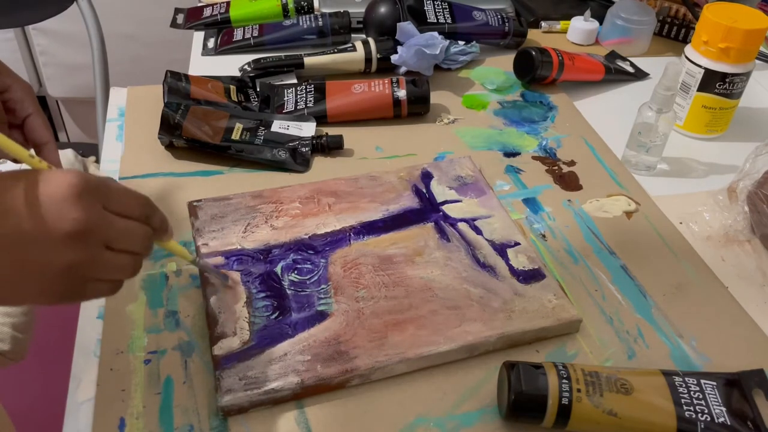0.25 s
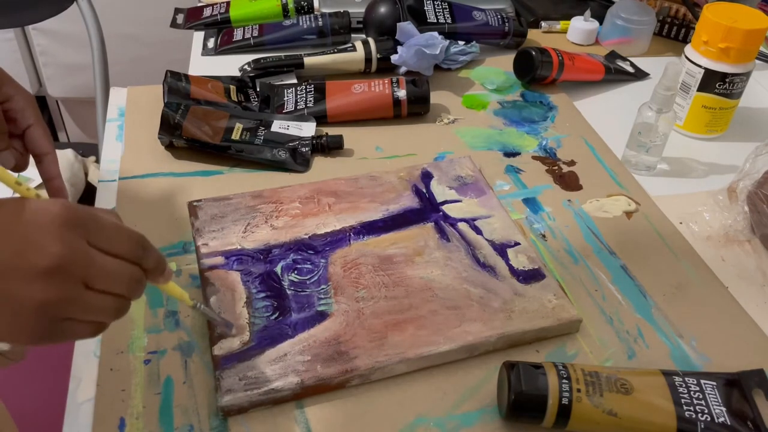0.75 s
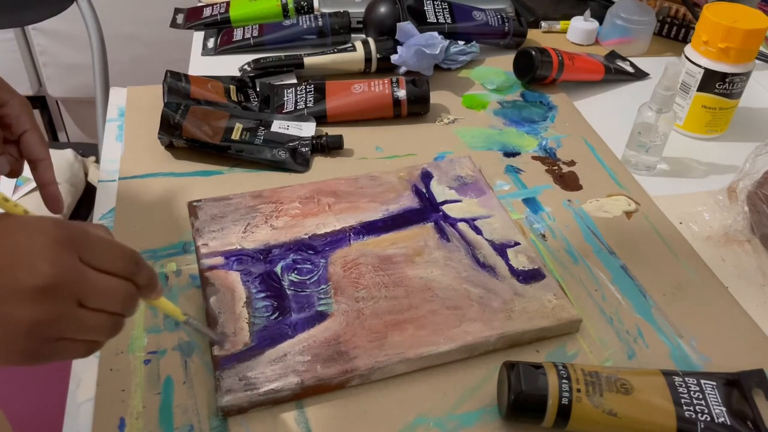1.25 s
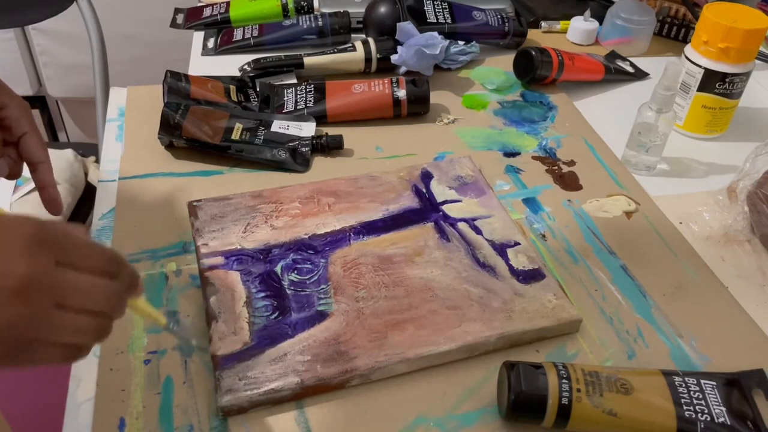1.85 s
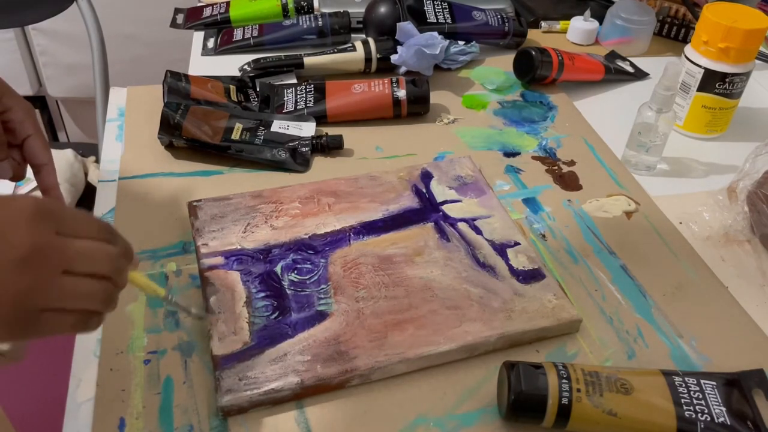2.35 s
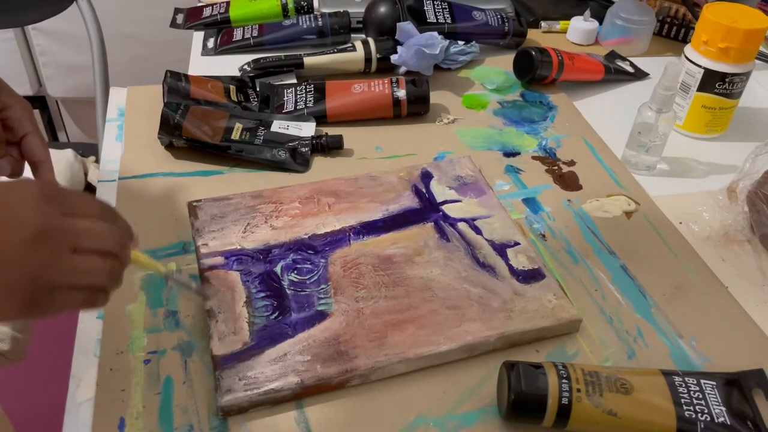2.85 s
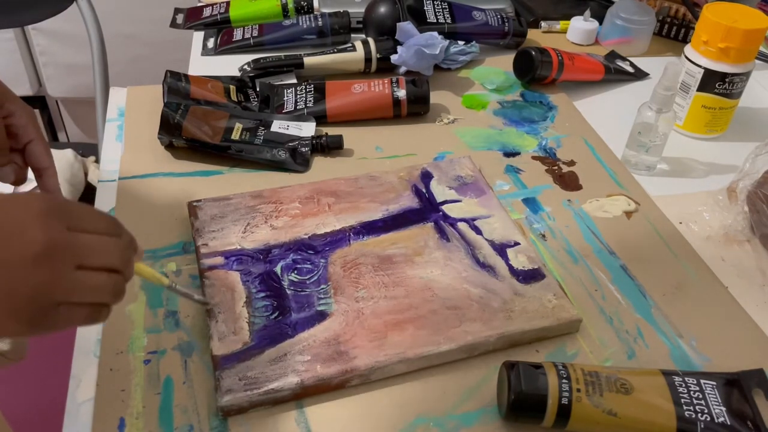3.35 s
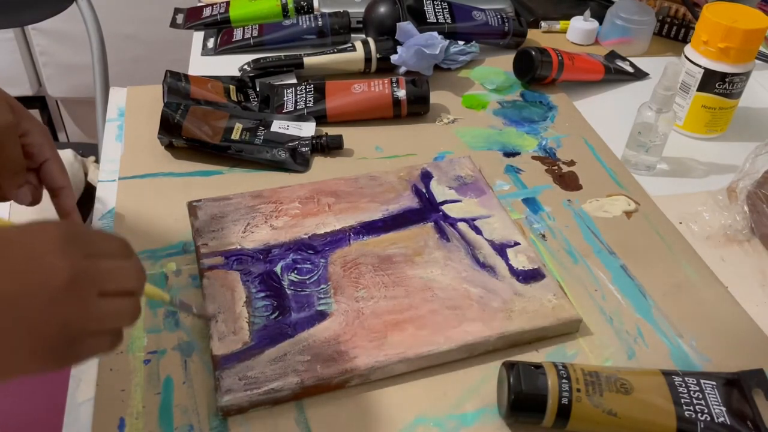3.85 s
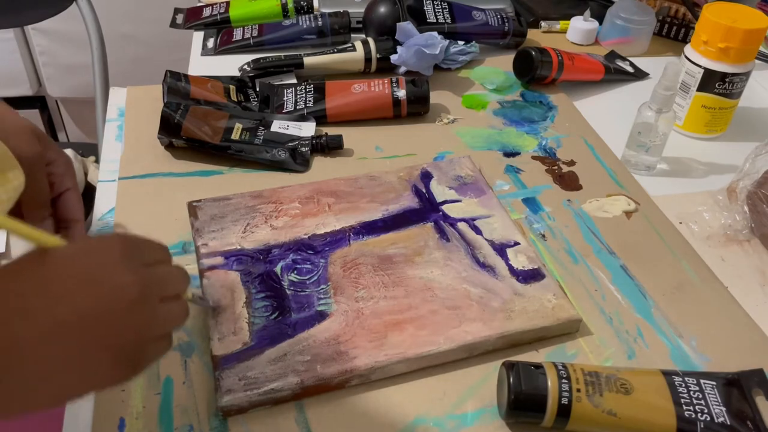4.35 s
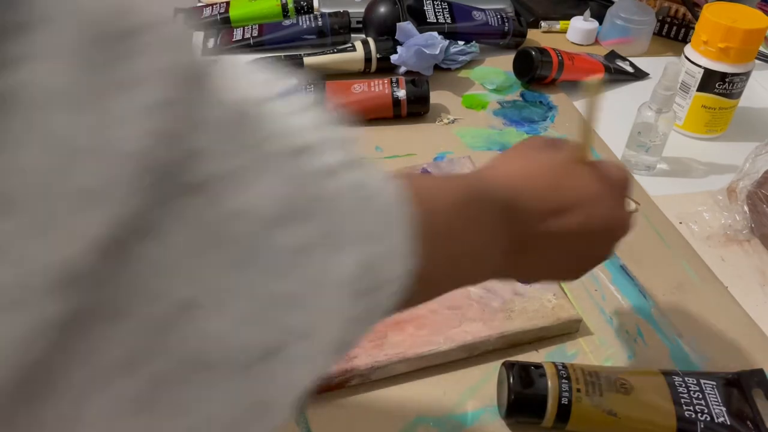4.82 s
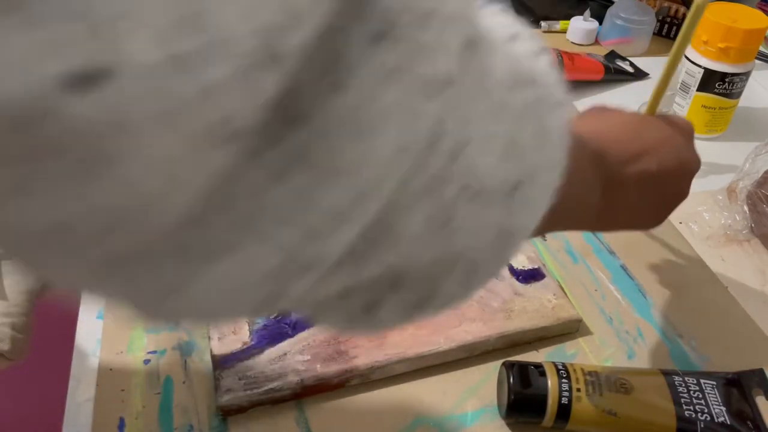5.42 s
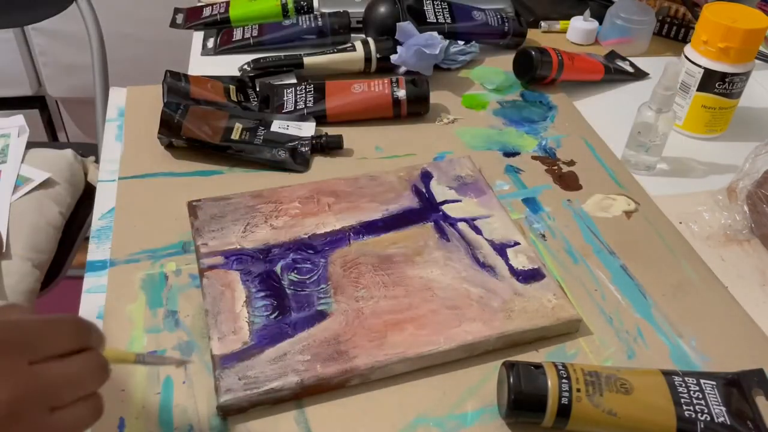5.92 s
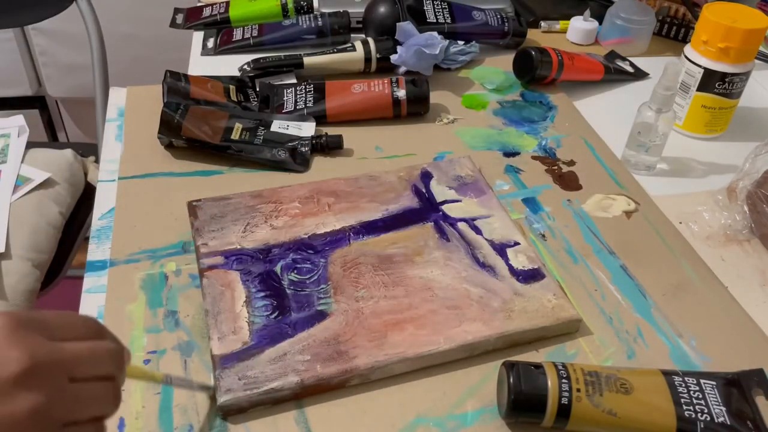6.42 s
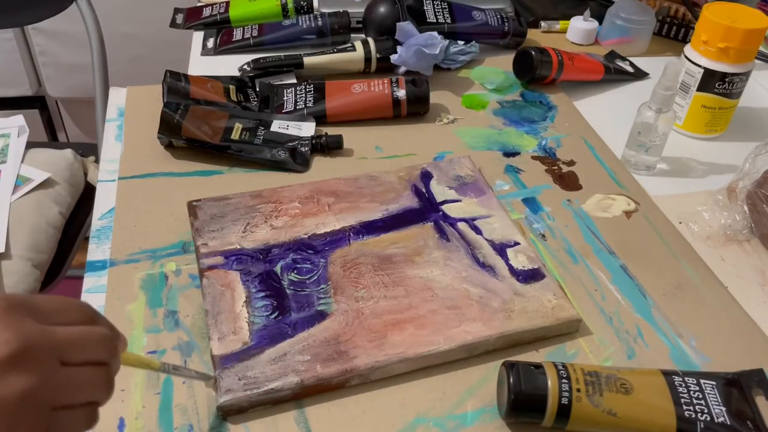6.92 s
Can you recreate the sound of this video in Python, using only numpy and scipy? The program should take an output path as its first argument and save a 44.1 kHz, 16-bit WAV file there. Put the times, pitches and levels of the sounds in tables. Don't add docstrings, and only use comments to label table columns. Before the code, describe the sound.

Close stereo pickup of bristles scratching dried paint: quick, thin, hissy swishes with a papery rasp and a faint drum of stretched cloth. Strokes start faint, become steady and stronger, and peak in a dull woody scrape past the middle. The brushing stops for muffled fabric rubs and small clicks, then resumes with grainy, slightly squeaky strokes at the canvas edge. A soft low fan hum fills the small dry room.

```python
import sys
import numpy as np
from scipy import signal
from scipy.fft import rfft, irfft, next_fast_len
from scipy.io import wavfile
from scipy.ndimage import uniform_filter1d

SR = 44100
rng = np.random.default_rng(int(sys.argv[2]) if len(sys.argv) > 2 else 0)


def inscribe(sig):
    pcm = np.round(np.clip(np.atleast_2d(sig).T, -1, 1) * 32767)
    wavfile.write(sys.argv[1], SR, pcm.astype(np.int16))


def convert_level_to_amplitude(level_db):
    exponent = np.asarray(level_db, float) / 20
    return 10 ** exponent


N = 316461

# start_s, length_s, speed_db, pressure_db
LIGHT_DABS = [(0.026, 0.065, -56, -1.5), (0.142, 0.065, -61.5, -5), (0.238, 0.11, -61, -1),
              (.378, 0.053, -74, -7), (.466, 0.067, -73, -12), (0.589, 0.035, -65, -15),
              (.682, 0.077, -59, -3.5), (.810, 0.036, -70, -6), (0.887, 0.055, -68, -18),
              (0.929, .081, -57, -7.5), (1.056, 0.073, -58, -5), (1.164, 0.078, -54.5, -7.5),
              (1.312, 0.069, -60, -9), (1.386, .075, -48, -5), (1.482, 0.065, -62, -8),
              (1.542, 0.06, -59, -7), (1.635, 0.04, -59.5, -5.5), (1.738, .068, -56, -4.5),
              (1.871, 0.055, -59, -6), (1.968, 0.076, -66, -25), (2.06, .09, -63, -28)]


def evened(x):
    return x / np.sqrt(np.mean(x ** 2, axis=-1, keepdims=True) + 1e-20)


def read(hz, points, values):
    return np.interp(np.log(hz + 1), np.log(points), values)


def colour(x, spectrum):
    f, db = np.transpose(spectrum)
    size = next_fast_len(N)
    hz = np.fft.rfftfreq(size, 1 / SR)
    shape = convert_level_to_amplitude(read(hz, f, db)) * (hz > f[0]) * (hz < f[-1])
    return evened(irfft(rfft(x, size) * shape, size)[:, :N])


def ring(x, modes, order=1):
    out = 0
    for k, (hz, width_hz, db) in enumerate(modes):
        y = x
        for _ in range(order):
            b, a = signal.iirpeak(hz, hz / width_hz, SR)
            y = signal.lfilter(b, a, y)
        out = out + (-1) ** k * convert_level_to_amplitude(db) * evened(y)
    return out


def swell(rows, bite=3.4, fade=2.4, lag_s=0.):
    coarse = np.arange(0, N, 64)
    t = coarse[:, None] / SR - lag_s
    peak_s, rise_s, fall_s, db = np.transpose(rows)
    rising = abs((t - peak_s) / rise_s) ** bite
    falling = abs((t - peak_s) / fall_s) ** fade
    phase = np.where(t < peak_s, rising, falling)
    power = (convert_level_to_amplitude(2 * db) * np.exp(-2 * phase)).sum(axis=1)
    return np.sqrt(np.interp(np.arange(N), coarse, power))


def slips(per_s, spread_db, weave_db):
    hit = rng.random((2, N)) < per_s / SR
    spread = np.minimum(rng.exponential(1, (2, N)), 5)
    size = convert_level_to_amplitude(spread_db * spread) * rng.standard_normal((2, N))
    weave = uniform_filter1d(uniform_filter1d(rng.standard_normal(N), 250), 250)
    return evened(hit * size * convert_level_to_amplitude(weave_db * evened(weave)))


def patchy(x, patch_db):
    z = signal.stft(x, nperseg=512, noverlap=384)[2]
    field = rng.standard_normal(z.shape[1:])
    for _ in range(2):
        field = uniform_filter1d(field, size=3, axis=0)
        field = uniform_filter1d(field, size=20, axis=1)
    z = z * convert_level_to_amplitude(patch_db * field / field.std())
    return evened(signal.istft(z, nperseg=512, noverlap=384)[1][:, :N])


def room_tone():
    # mode_hz, width_hz, level_db
    room_modes = [(49.6, 5.9, -48), (63.9, 10.8, -49.5), (91.94, 4.9, -50.5), (130.7, 12, -52.5),
                  (180.5, 12, -53), (291.9, 11.7, -54), (321.6, 6, -56.5), (356, 13.3, -57.5),
                  (531, 20, -72.5), (664, 21.7, -63.5), (912, 49, -69.5), (1100, 30, -78),
                  (1255, 14, -90.5), (1526, 42, -81.5)]
    # frequency_hz, level_db
    rumble_spectrum = [(15, -9), (30, -8), (80, -2.5), (110, -7), (230, -11), (380, -11.5), (430, -18.5),
                       (800, -21.5), (1050, -42)]
    # frequency_hz, level_db
    hiss_spectrum = [(1000, -3.5), (1500, -12), (2200, -18.5), (3200, -22.5), (5000, -24), (7000, -25),
                     (9500, -20.5), (11500, -18.5), (13000, -13.5), (14000, -22), (14700, -31.3)]
    # fan_hz, fan_db, wander_hz
    fan_line = (49.5, -46, 1.25)
    rumble_db, hiss_db = -49, -71.5

    hum, rumble, hiss = rng.standard_normal((3, 2, N))
    fan_hz, fan_db, wander_hz = fan_line
    drift = evened(uniform_filter1d(hum[::-1], size=4000))
    phase = 2 * np.pi * np.cumsum(fan_hz + wander_hz * drift, axis=1) / SR
    fan = convert_level_to_amplitude(fan_db) * np.sqrt(2) * np.sin(phase)
    rumble = convert_level_to_amplitude(rumble_db) * colour(rumble, rumble_spectrum)
    hiss = convert_level_to_amplitude(hiss_db) * colour(hiss, hiss_spectrum)
    return fan + ring(hum, room_modes) + rumble + hiss


def walls(x):
    t60_s, wet_db, gap_s = 0.32, -17, .004
    t = np.arange(SR // 3) / SR
    echoes = rng.choice([-1., 1.], len(t)) * (rng.random(len(t)) < .05)
    tail = echoes * convert_level_to_amplitude(-60 * t / t60_s) * (t > gap_s)
    tail = tail / np.linalg.norm(tail)
    return x + convert_level_to_amplitude(wet_db) * signal.fftconvolve(x, tail[None], axes=1)[:, :N]


def ticks():
    # start_s, peak_db, centre_hz
    snap_events = [(4.5381, -53, 12800), (4.6513, -51, 12500), (4.8964, -53, 12900), (5.022, -41, 13000),
                   (5.11, -41, 13800), (5.12, -34.5, 12900), (5.3313, -38, 12900), (5.5657, -43, 12700),
                   (5.5804, -56, 3920), (2.9805, -43, 12900), (3.1725, -33, 12900), (1.381, -40, 12900),
                   (6.929, -40, 12900)]
    length = 400
    out, t = np.zeros((2, N)), np.arange(length) / SR
    for start_s, db, hz in snap_events:
        puff = rng.standard_normal((2, length)) * np.exp(-t / 0.0021)
        snap = ring(puff, [(hz, 2500, 0), (9500, 5000, -4), (4500, 4000, -10), (1700, 1500, -13)])
        snap = signal.windows.tukey(length, .15) * snap / abs(snap).max()
        at = round(start_s * SR)
        out[:, at:at + length] += convert_level_to_amplitude(db - 4) * snap
    return out


def frame():
    # peak_s, rise_s, fall_s, level_db
    bumps = [
        (4.074, 0.011, 0.034, -34.5),
        (4.15, .04, 0.085, -50.5),
        (4.02, 0.023, .03, -48),
        (5.9, 0.017, 0.039, -58),
        (6.4, 0.027, 0.033, -56),
        (0.051, 0.027, 0.057, -54.5),
    ]
    # mode_hz, width_hz, level_db
    wood_modes = [(313, 240, -1.5), (525, 160, -6), (679, 107, 3.5), (910, 97, -11.5), (1100, 38, -10.5),
                  (1276, 33, -10), (1530, 82, -16)]
    shaking = ring(slips(6000, 1.4, 0.65), wood_modes, order=2)
    return evened(shaking) * swell(bumps, bite=6.7, fade=2.0)


def catches():
    # peak_s, length_s, level_db, pitch_hz
    sings = [(0.063, .071, -53.5, 935), (0.831, .039, -62.5, 1480), (.9, 0.039, -62, 1530),
             (0.966, .074, -57, 1480), (1.103, 0.081, -60, 1430), (1.191, .051, -60, 1470),
             (4.587, 0.032, -65, 1100), (5.003, 0.027, -60, 1150), (5.225, .09, -61, 1080),
             (6.387, 0.1, -57, 5080), (6.597, 0.05, -58, 1360), (6.705, 0.067, -62, 5050),
             (6.969, .059, -54, 5000), (7.037, .034, -55, 2050), (7.036, 0.049, -51.5, 950),
             (2.033, 0.17, -70, 1260)]
    # peak_s, length_s, level_db, pitch_hz
    scuffs = [(4.192, .073, -54, 1850), (4.898, .019, -68, 1300), (6.37, .1, -62, 3600),
              (6.531, .039, -54.5, 3370), (.5, .183, -74.5, 1500), (1.0, .19, -69.5, 1490),
              (4.077, .034, -46, 1200), (7.04, .045, -58, 1500), (5.007, .03, -55, 750),
              (.29, .11, -60, 1000), (2.555, .07, -60, 1800), (4.01, .07, -61, 1500),
              (4.31, .07, -61, 1600), (4.17, .11, -55, 1150), (.74, .1, -62, 1700), (6.45, .05, -59, 1000),
              (7.13, .1, -58, 750), (5.055, .045, -60, 1100), (4.076, .028, -58, 3700),
              (5.062, .034, -62, 2800)]
    sing_width_hz, scuff_width = 280, 0.38
    rise_share = 0.48
    bursts = [(*c, sing_width_hz) for c in sings] + [(*c, scuff_width * c[3]) for c in scuffs]

    out = np.zeros((2, N))
    for peak_s, length_s, db, hz, width_hz in bursts:
        at = max(round((peak_s - .15) * SR), 0)
        t = np.arange(at, min(at + SR // 3, N)) / SR
        noise = rng.standard_normal((2, SR // 3))
        tone = ring(noise, [(hz, width_hz, db)], order=2)[:, :len(t)]
        share = np.where(t < peak_s, rise_share, 1 - rise_share)
        out[:, at:at + len(t)] += tone * np.exp(-((t - peak_s) / share / length_s) ** 2)
    return out


def gestures():
    # start_s, length_s, speed_db, pressure_db
    firm_scrubs = [(2.123, .071, -54.5, -5), (2.254, 0.098, -56.5, -12), (2.365, 0.094, -50.5, -0.2),
                   (2.515, 0.049, -50, -2.5), (2.632, 0.099, -55.4, -8.5), (2.773, 0.072, -53.5, -6),
                   (2.881, .069, -49.5, -3), (2.992, 0.079, -49, -5.5), (3.113, 0.074, -48, -4.5),
                   (3.233, 0.067, -51.5, -2.2), (3.345, 0.073, -46.5, -5.5), (3.470, 0.075, -49.5, -3),
                   (3.588, 0.06, -51, -6), (3.713, .094, -50.5, -4.5), (3.866, 0.11, -60, -19),
                   (3.912, 0.069, -59.5, -4.5), (3.994, 0.059, -48.5, -7), (4.113, 0.079, -43, -8),
                   (4.160, 0.069, -53.5, -2.5), (4.259, .075, -51.5, -8), (4.372, 0.086, -48.5, -3.5)]
    # start_s, length_s, speed_db, pressure_db
    edge_strokes = [(6.209, 0.054, -70, 10.5), (6.306, 0.084, -55.5, 4.5), (6.328, 0.12, -50, -0.5),
                    (6.507, 0.086, -54.5, -0.7), (6.562, 0.058, -55.5, 1.2), (6.665, 0.065, -49, -1.5),
                    (6.720, 0.055, -55, -2), (6.808, .04, -68.5, 1), (6.840, 0.065, -55.5, 2.2),
                    (6.927, .1, -49, -2), (7.014, 0.054, -58, 1.5), (7.110, 0.14, -55.5, 5.5)]
    # rising_share, cloth_db at usual speed
    grips = [
        (0.41, -62.5),
        (0.45, -60.5),
        (.4, -60),
    ]
    # start_s, length_s, rising_share, rasp_db, weight_db
    rubs = [
        (4.058, 0.045, .27, -57.5, 11),
        (4.5, .5, .4, -80, 5),
        (4.988, 0.024, .45, -73, 13),
        (5.036, 0.051, .36, -61.5, 5),
        (5.192, 0.14, 0.12, -72, 6.5),
        (5.243, 0.12, .54, -61.5, -2.5),
        (5.42, 0.077, 0.19, -56.5, 2.5),
        (5.412, 0.18, .45, -73, 1),
        (5.564, .2, 0.53, -63, 5.5),
        (5.744, .11, .31, -69, 4.5),
    ]
    usual_db = -55
    cloth_per_speed, cloth_per_pressure = 0.72, 0.49
    rub_tips_db, tips_per_weight = -1, -.35

    rows = []
    for strokes, (share, grip_db) in zip((LIGHT_DABS, firm_scrubs, edge_strokes), grips):
        for start_s, length_s, db, press_db in strokes:
            rise_s, fall_s = share * length_s, (1 - share) * length_s
            cloth_db = grip_db + cloth_per_speed * (db - usual_db) + cloth_per_pressure * press_db
            rows.append((start_s + rise_s, rise_s, fall_s, db, db + press_db, cloth_db))
    for start_s, length_s, share, db, weight_db in rubs:
        rise_s, fall_s = share * length_s, (1 - share) * length_s
        tips_db = db + rub_tips_db + tips_per_weight * weight_db
        rows.append((start_s + rise_s, rise_s, fall_s, tips_db, db, db + weight_db))
    return np.array(rows)


def brush():
    # frequency_hz, level_db
    tip_spectrum = [(5500, -14.5), (7300, -8.5), (8500, 1.5), (9700, -1.5), (11500, -0.9), (13000, 1.5),
                    (14500, -2.5), (15700, -12)]
    # frequency_hz, level_db
    crust_spectrum = [(1600, -35), (2500, -3), (3200, -1), (4200, 1), (5150, 1), (5900, -5.5), (7200, -3),
                      (9000, -50)]
    # frequency_hz, level_db
    skim_spectrum = [(1600, -27), (2500, -4), (3000, -8.5), (3700, -0.5), (5150, 1.5), (6500, -3),
                     (7500, -2), (9000, -46)]
    # mode_hz, width_hz, level_db
    cloth_modes = [(692, 126, -2), (943, 120, -3.5), (1115, 76, -7), (1480, 270, -2.5), (2050, 630, -3.5)]

    rows = gestures()
    drive = patchy(slips(22000, 2.1, .9), 2.2)
    tips = colour(drive, tip_spectrum) * swell(rows[:, [0, 1, 2, 3]])
    light, firm = np.split(rows[:, [0, 1, 2, 4]], [len(LIGHT_DABS)])
    crust = colour(drive, skim_spectrum) * swell(light)
    crust = crust + colour(drive, crust_spectrum) * swell(firm, lag_s=0.0036)
    cloth = evened(ring(drive, cloth_modes)) * swell(rows[:, [0, 1, 2, 5]], 2.2, 1.53, 0.0069)
    return convert_level_to_amplitude(1.35) * tips + convert_level_to_amplitude(-2.5) * crust + convert_level_to_amplitude(1.9) * cloth


def scene():
    return walls(brush() + catches() + frame() + ticks()) + room_tone()


def top_cut(x):
    return signal.sosfilt(signal.butter(12, 15730, fs=SR, output="sos"), x)


def record(dry):
    # frequency_hz, likeness (0-1), right_lead_rad, left_minus_right_db
    port_pair = [(50, .995, 0, -1.5), (90, .9, -.2, -4), (130, .92, .1, -1.5), (180, .52, .6, 4.5),
                 (250, .74, -.9, 0), (330, .43, -.6, 1.7), (850, .15, -1.5, 1.5), (2000, .45, -.2, 2.5),
                 (3300, .4, -.7, 6), (5000, .65, -.1, 4), (6200, .62, 1.1, 1), (7300, .6, 1.7, 1),
                 (8000, .9, 2.9, 0), (8300, .95, np.pi, 0), (9400, .95, np.pi, 0), (9900, .8, 3.9, 0),
                 (11400, .78, 4.9, 0), (12600, .86, 5.8, 0), (13300, .97, 2 * np.pi, 0)]
    hz = np.fft.rfftfreq(N, 1 / SR)
    f, like, turn, lean_db = np.transpose(port_pair)
    like = np.clip(read(hz, f, like), 0, 1)
    shared, other = rfft(dry)
    right = like * np.exp(1j * read(hz, f, turn)) * shared + np.sqrt(1 - like ** 2) * other
    lean = convert_level_to_amplitude(read(hz, f, lean_db) / 2)
    mix = irfft(np.array([shared * lean, right / lean]), N)
    return top_cut(mix)


dry = scene()
out = record(dry)
inscribe(out)
```